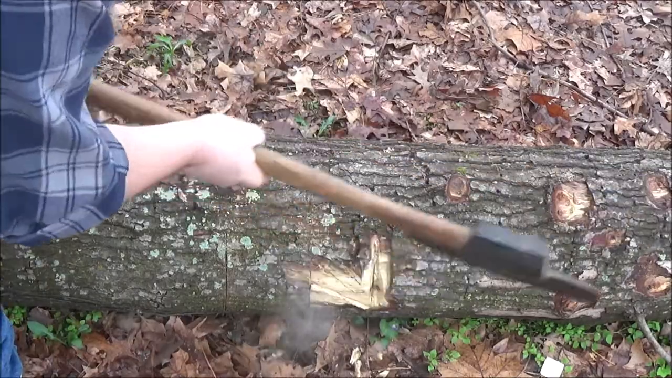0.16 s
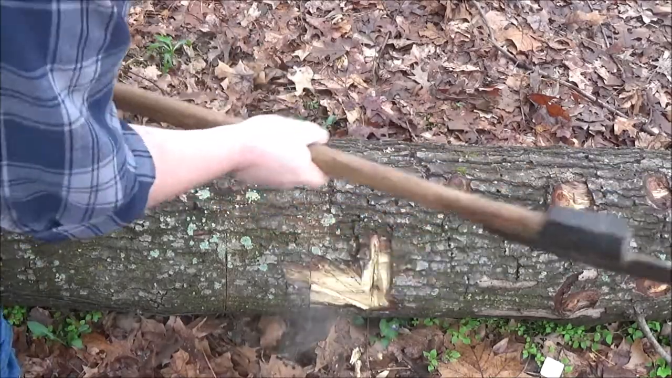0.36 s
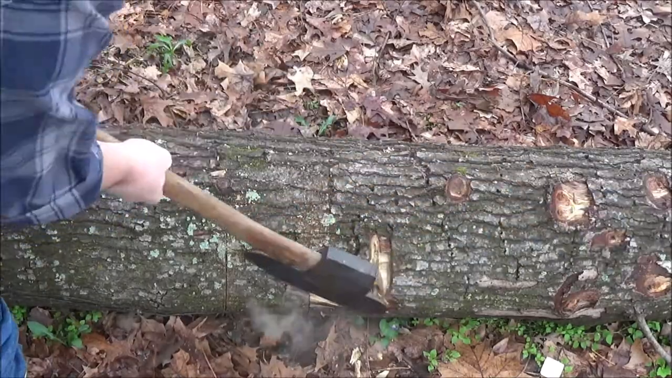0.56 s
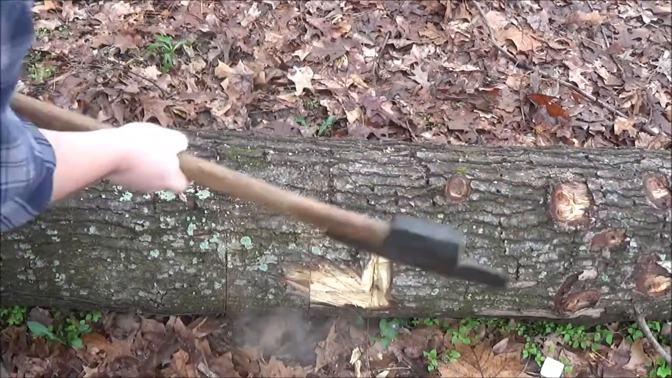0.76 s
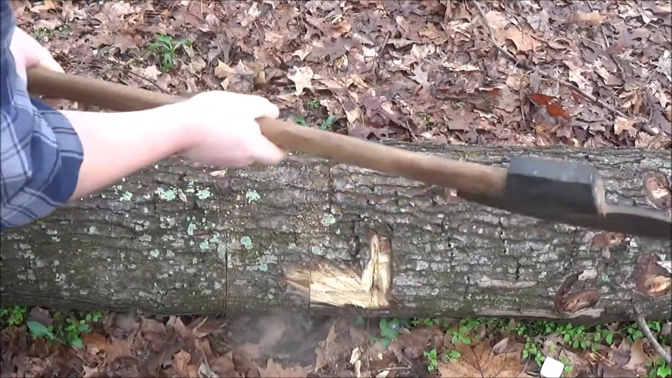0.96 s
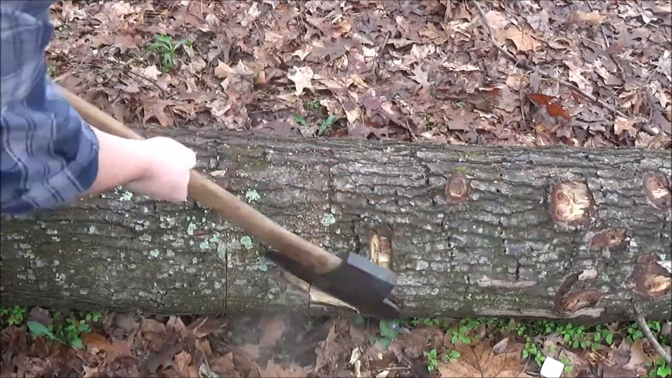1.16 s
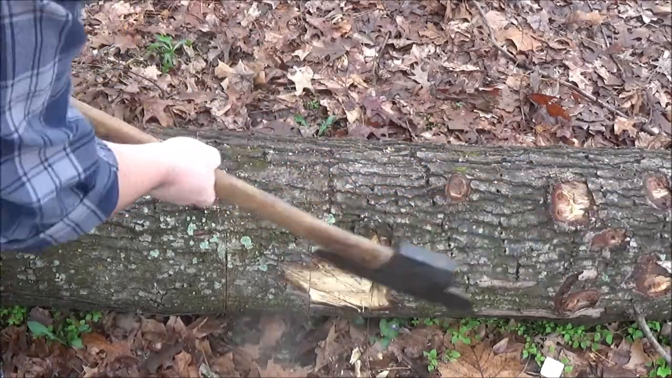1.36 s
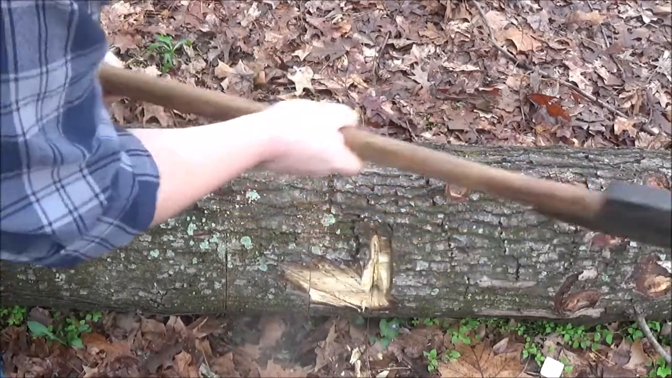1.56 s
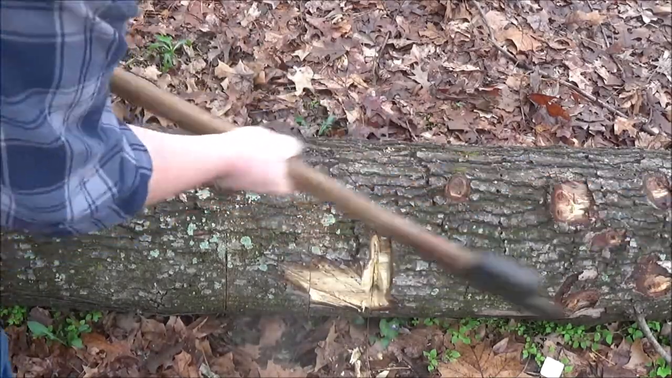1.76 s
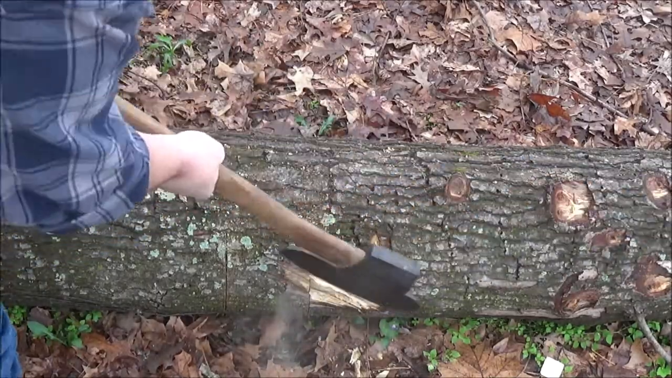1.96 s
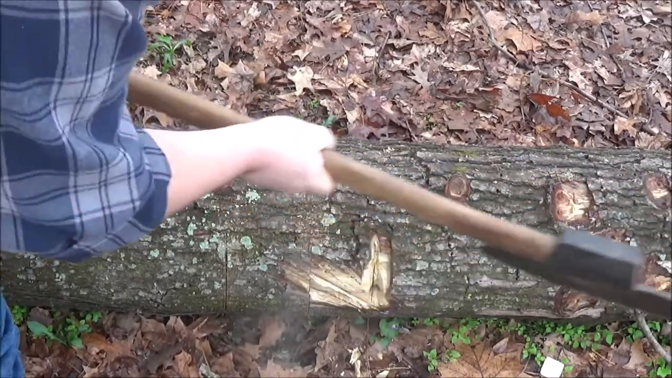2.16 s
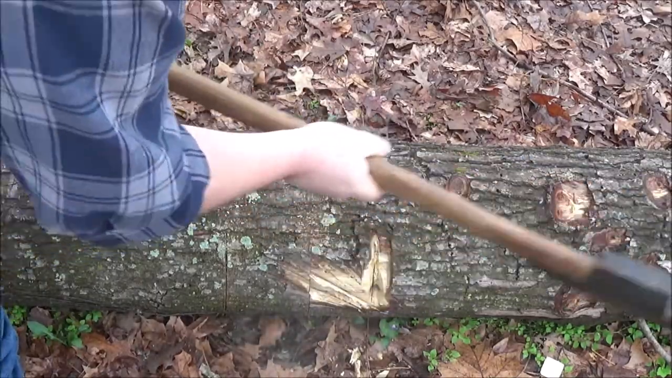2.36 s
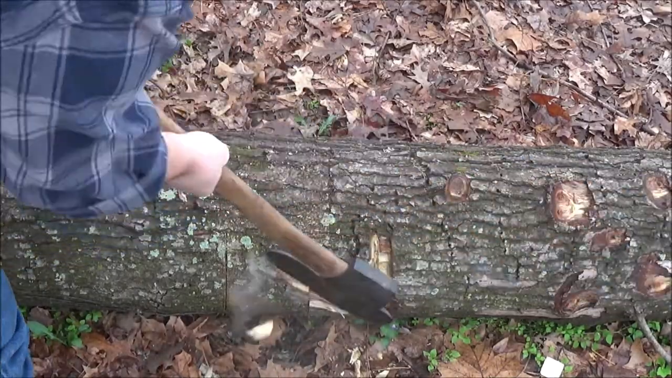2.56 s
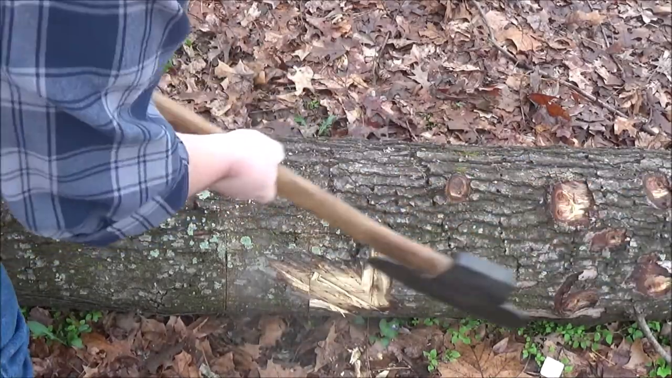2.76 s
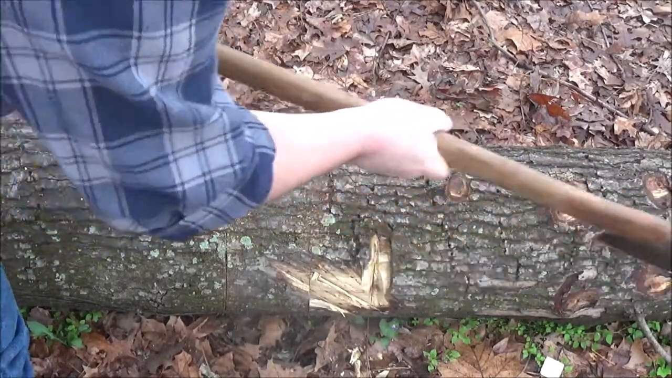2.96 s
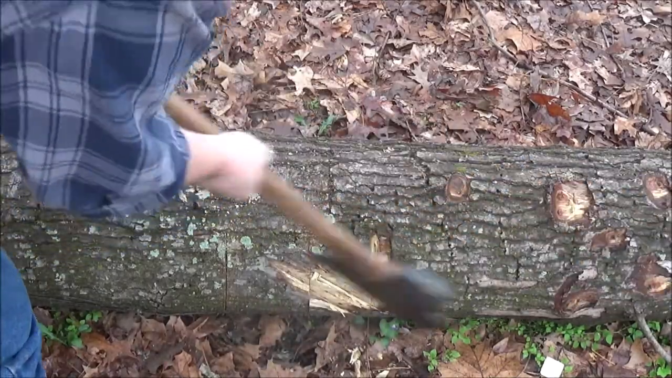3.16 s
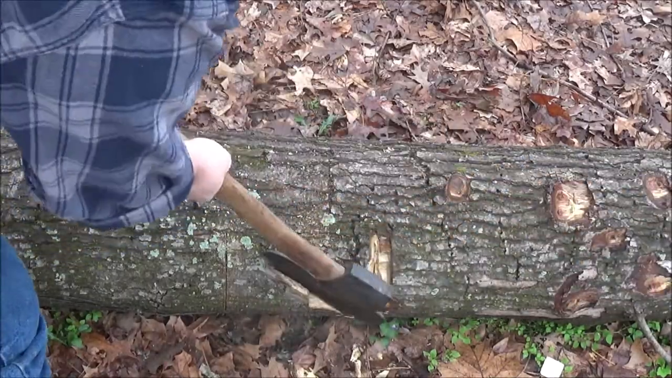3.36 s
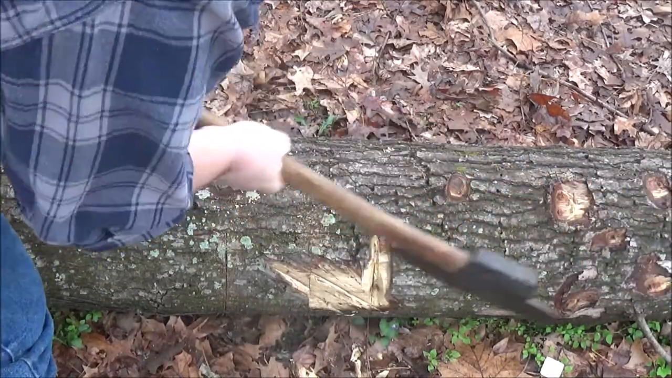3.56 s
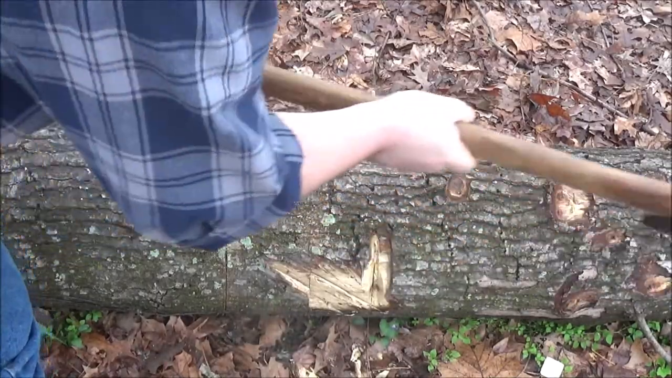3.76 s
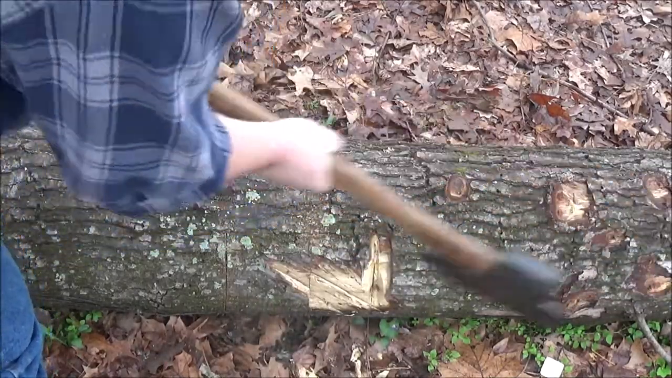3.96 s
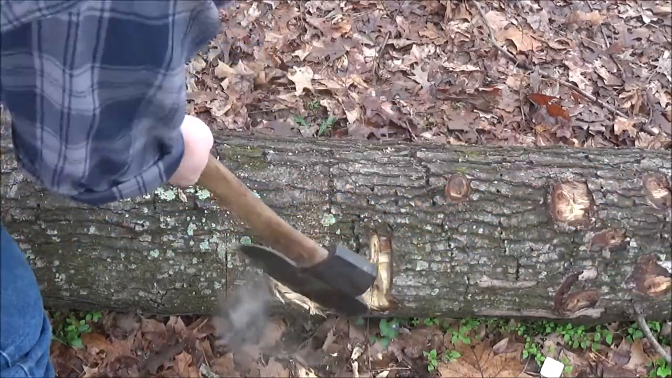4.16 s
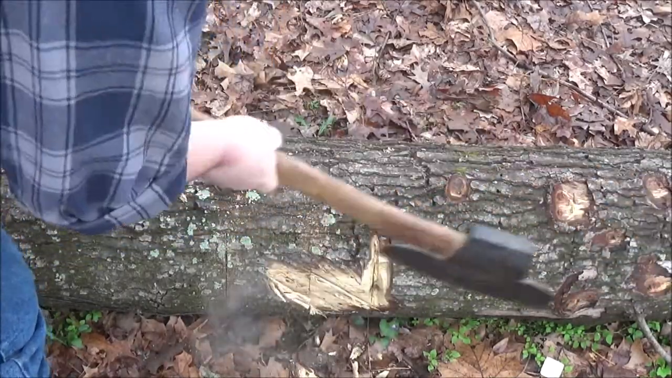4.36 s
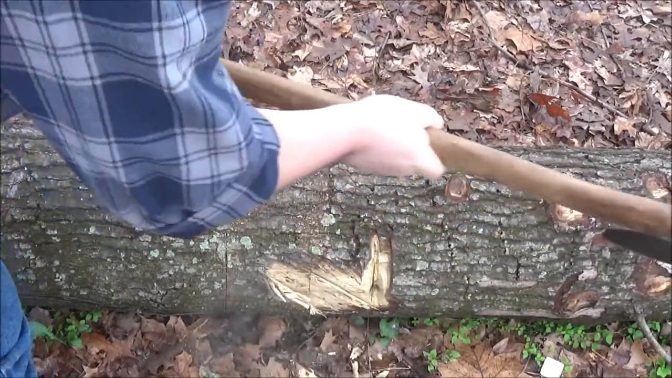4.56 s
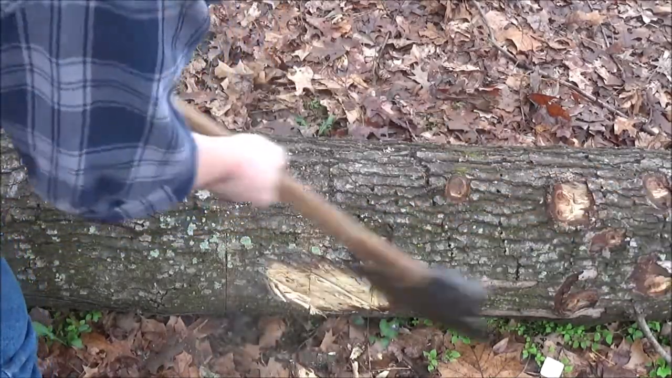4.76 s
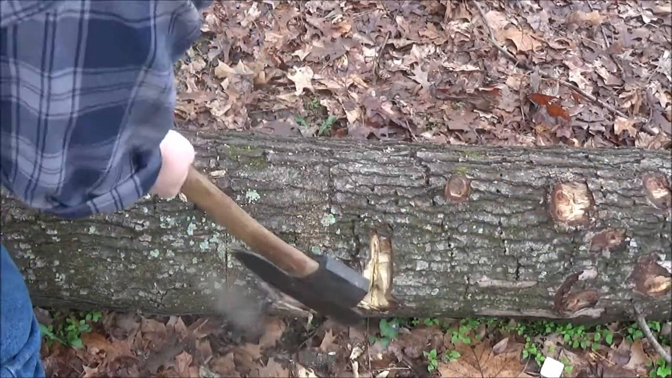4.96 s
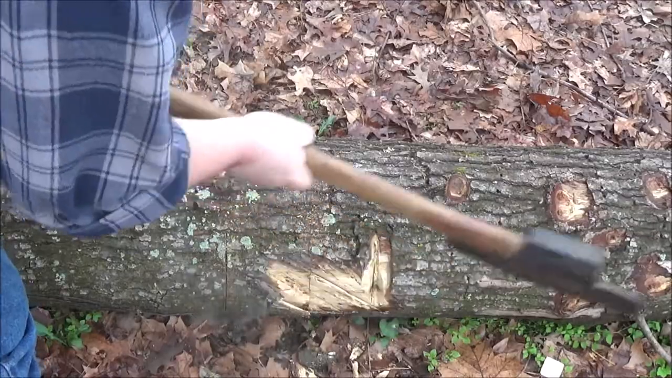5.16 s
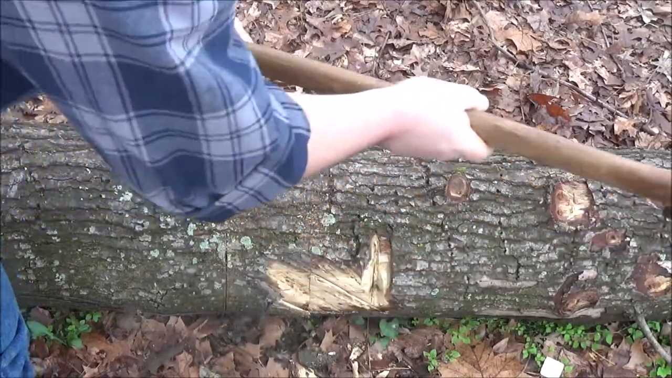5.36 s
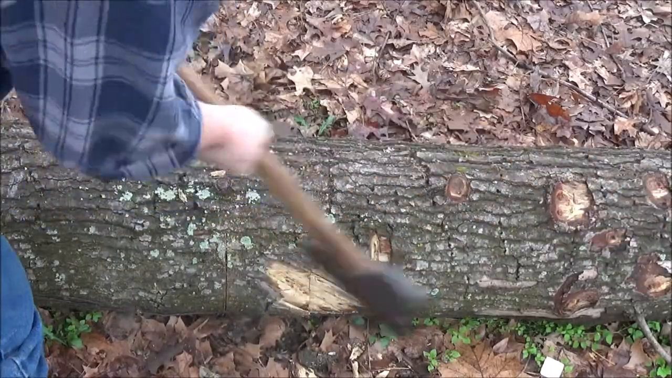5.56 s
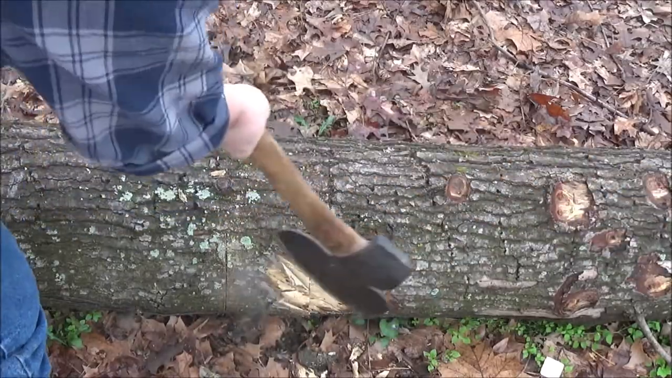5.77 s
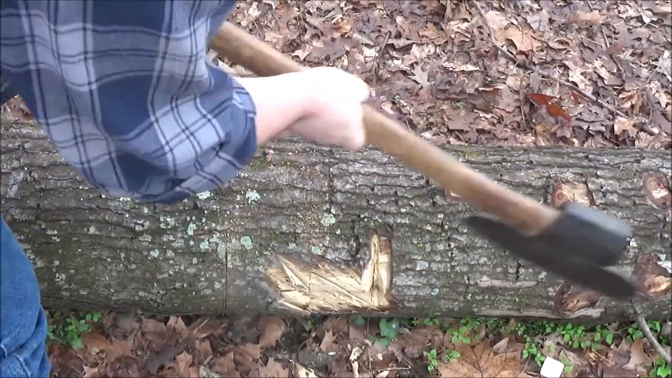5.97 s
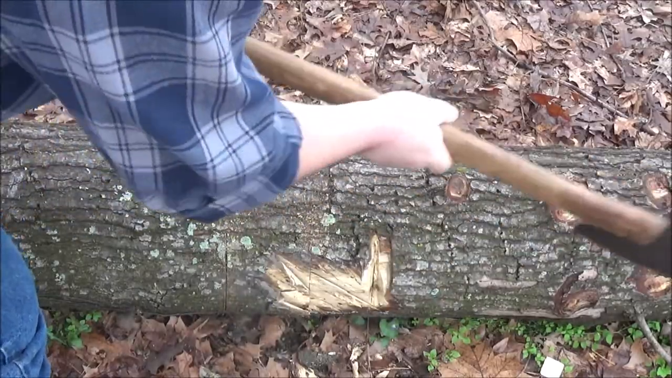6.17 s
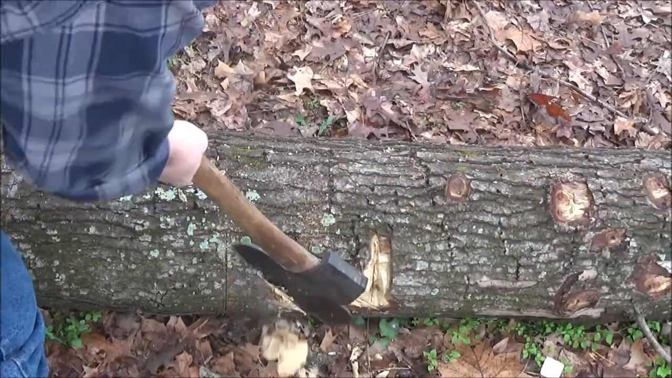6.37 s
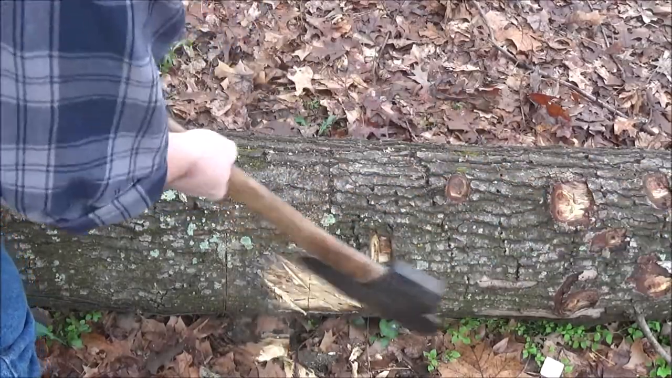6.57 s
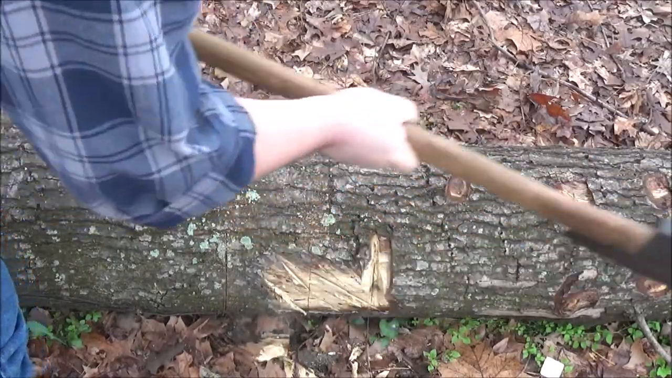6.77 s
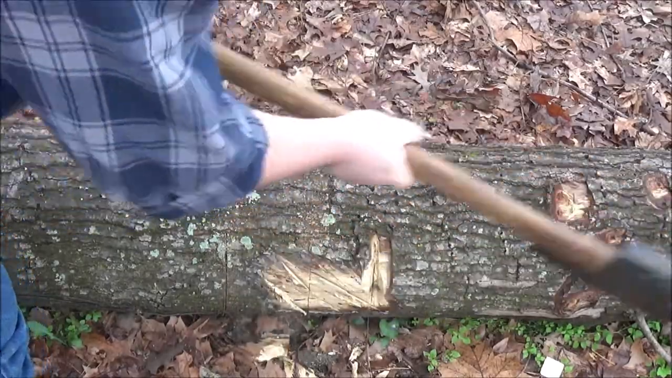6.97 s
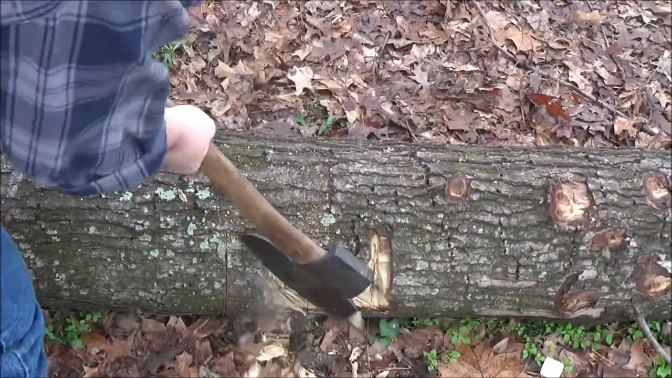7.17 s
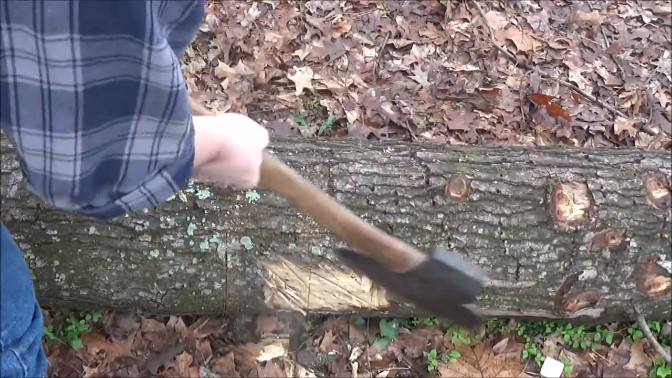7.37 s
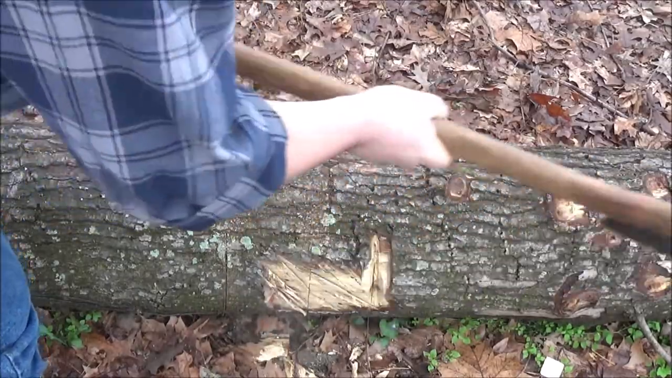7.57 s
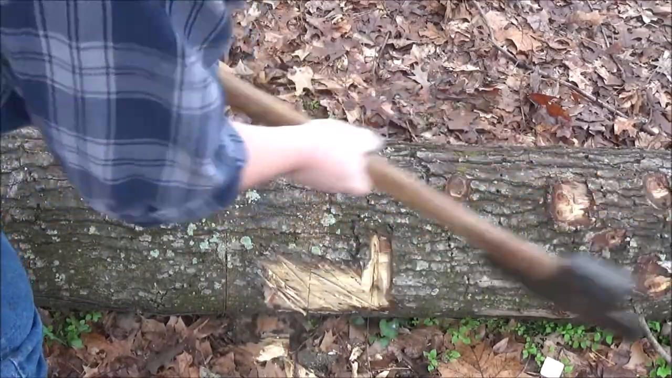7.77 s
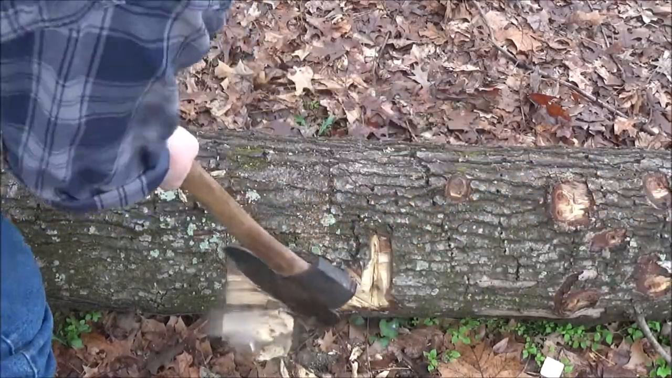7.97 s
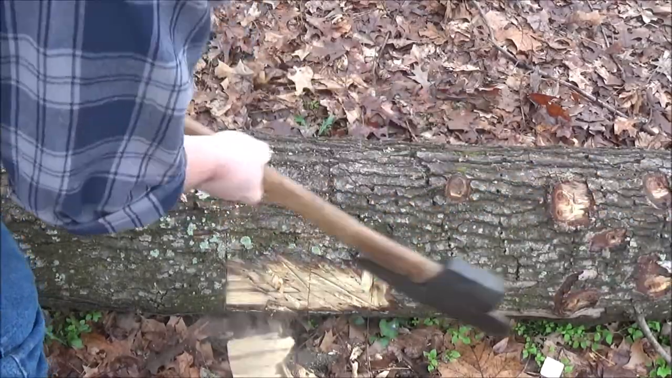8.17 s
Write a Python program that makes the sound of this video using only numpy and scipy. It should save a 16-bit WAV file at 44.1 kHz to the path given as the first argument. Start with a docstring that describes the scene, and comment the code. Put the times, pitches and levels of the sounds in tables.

```python
"""In a wood, with a far rush, a faint hum and a trill of quick pips, an axe hews a felled log close to the microphone.
About three blows fall in two seconds: noise snaps make the bite and split, damped modes the knock and boom.
After each, filtered crackle showers chips and bark into dry leaves, with a few brief soft swishes of the same rustle.
From about two seconds come faint thin whistling sines, level or gliding, and high rising chirps; late on the rush grows.
The trees answer all but the rush, hum and trill with a weak diffuse tail."""
import sys
import numpy as np
from scipy import signal
from scipy.fft import rfft, irfft
from scipy.io import wavfile
from scipy.ndimage import map_coordinates

SR = 44100
rng = np.random.default_rng(int(sys.argv[2]) if len(sys.argv) > 2 else 0)


def materialize(psi):
    """Save the field psi as 16-bit PCM at rate SR to the path in sys.argv[1].

    A 1-D psi becomes a single channel; in a 2-D psi each row is a channel.
    """
    bounded = np.clip(np.atleast_2d(psi).T, -1, 1)
    quanta = np.round(bounded * 32767).astype(np.int16)
    wavfile.write(sys.argv[1], SR, quanta)


N = 362502

# axe blows: (time [s], bite level [dB], wait until the split [s], split length [s], split level [dB],
#   brightness [dB/octave], knock level [dB], boom level [dB], boom centre [Hz],
#   debris level [dB], debris keeps falling for [s])
BLOWS = [(-0.055, -20, 0.003, 0.006, -1, 3, -27, -27.5, 258, -35.5, 0.16),
         (0.5359, -17.5, 0.0018, 0.0094, -12.5, 1.5, -27.5, -31.5, 368, -41.5, 0.57),
         (1.1785, -25.5, 0.0044, 0.0014, -9.5, 0.7, -25.5, -23, 416, -42, 0.24),
         (1.864, -24, 0.0019, 0.0033, -8.5, 2.5, -28, -21, 300, -39, 0.14),
         (2.5275, -13, 0.0034, 0.0057, -12.5, -0.5, -16.5, -26, 287, -45.5, 0.32),
         (3.2378, -19, 0.0029, 0.0022, -9.5, 0.5, -17.5, -23.5, 352, -41, 0.12),
         (4.072, -16, 0.0036, 0.0071, -13, 0.3, -22, -31, 302, -35, 0.24),
         (4.854, -23, 0.0019, 0.012, -13.5, 0.2, -21, -29.5, 305, -45, 0.24),
         (5.6306, -20, 0.0025, 0.0059, -12, 2, -26.5, -24, 334, -43.5, 0.44),
         (6.368, -10.5, 0.0038, 0.0068, -11.5, 1.5, -24, -25, 336, -40.5, 0.24),
         (7.1233, -13.5, 0.0027, 0.0049, -11, 0.5, -23, -26.5, 273, -40, 0.26),
         (7.9014, -20, 0.0013, 0.0095, -13, -0.5, -16.5, -24, 325, -39.5, 0.41)]
# spectrum of crushed dry leaves: (frequency [Hz], relative level [dB])
DRY_LEAF_SPECTRUM = [(80, -30), (400, -10), (1000, -3.5), (2000, -2), (4000, -0.5), (6500, 0.5),
                     (9300, 2.5), (11000, -6.5), (15500, -21.5)]


def amp(db):
    """Decibels to gain."""
    return 10 ** (np.asarray(db) / 20)


def unit(x):
    """Scaled to rms 1."""
    return x / np.sqrt(np.mean(x ** 2) + 1e-20)


def along(points, hz):
    """Values at hz, interpolated between (Hz, value) points on a log frequency axis."""
    f, v = np.transpose(points)
    return np.interp(np.log(hz + 1), np.log(f + 1), v)


def wobble(rate):
    """A smooth random curve, rate knots a second."""
    knots = rng.standard_normal(int(N * rate / SR) + 4)
    return map_coordinates(knots, [np.arange(N) * rate / SR])


def coloured(x, db_of_hz, size=2048):
    """x through a causal minimum-phase filter of unit energy with the given relative dB response."""
    cepstrum = irfft(np.log(amp(db_of_hz(np.fft.rfftfreq(size, 1 / SR))) + 1e-6))
    # folding the cepstrum forward makes the filter causal
    cepstrum[1:size // 2] *= 2
    cepstrum[size // 2 + 1:] = 0
    kernel = irfft(np.exp(rfft(cepstrum)))
    return signal.fftconvolve(x, kernel / np.linalg.norm(kernel))[:len(x)]


def tilt(hz, db_per_octave):
    """A spectral slope from 700 Hz to 10 kHz, flat beyond, in dB about 4 kHz."""
    return db_per_octave * np.log2(np.clip(hz, 700, 10000) / 4000)


def crackle(count, rate, spread_db):
    """Random snaps of either sign and uneven size, rate a second on average, rms 1."""
    hit = rng.random(count) < rate / SR
    sign = rng.choice([-1, 1], count)
    size = amp(spread_db * np.clip(rng.standard_normal(count), -2, 2))
    return unit(hit * sign * size)


def held(x, seconds):
    """x scaled to the energy of rms 1 held for that long."""
    return x * np.sqrt(seconds * SR / (np.sum(x ** 2) + 1e-20))


def add(track, s, sound):
    """Mix a sound into the track from time s, as far as it overlaps."""
    start = round(s * SR)
    sound = sound[..., max(-start, 0):]
    part = track[..., max(start, 0):max(start, 0) + sound.shape[-1]]
    part += sound[..., :part.shape[-1]]


def placed(x, pan_db):
    """Mono to stereo with a level difference."""
    return x * amp([[pan_db / 2], [-pan_db / 2]])


def burst(t, length, rise, fall):
    """An envelope that opens at t = 0, holds, then dies with time constant fall."""
    opening = 1 - np.exp(-np.maximum(t, 0) / rise)
    return opening * np.exp(-np.maximum(t - length, 0) / fall)


def ring(modes, t, drive, scatter_db, detune):
    """Damped modes under a drive (dB by Hz); each blow draws new strengths, pitches and phases."""
    hz, db, t60 = np.transpose(modes)[:, :, None]
    size, pitch, phase = rng.standard_normal((3, len(modes), 1))
    gain = amp(db + scatter_db * size + drive(hz) - 60 * t / t60)
    return np.sum(gain * np.sin(2 * np.pi * (hz * (1 + detune * pitch) * t + phase)), 0)


def far_rush():
    """Distant filtered noise, strongest below 1 kHz, almost steady and then slowly growing."""
    # spectrum of the far rush: (frequency [Hz], relative level [dB])
    air = [(15, -79), (25, -26.5), (134, -7.5), (285, -12), (451, -4.5), (545, -3.5), (591, -3.5), (775, 0),
           (1020, -2), (1940, -11.5), (3080, -15.5), (3720, -18.5), (6380, -20.5), (16000, -34)]
    rush_db, swell_from_s, swell_db_per_s = -46, 6.33, 2
    mid, side = (coloured(rng.standard_normal(N), lambda hz: along(air, hz), size=8192) for _ in range(2))
    swell_db = swell_db_per_s * np.maximum(np.arange(N) / SR - swell_from_s, 0)
    level = amp(rush_db + swell_db + 0.14 * wobble(6.7))
    return level * (mid + amp(-11) * np.array([side, -side]))


def drone(centre_hz=735, width_hz=22):
    """Narrow-band noise: a faint wavering hum within the distant rush."""
    band = lambda hz: -20 * np.log10(1 + ((hz - centre_hz) / width_hz) ** 2)
    hum = coloured(rng.standard_normal(N), band, size=8192)
    return amp(-68.5 + 4.1 * wobble(1)) * hum


def trill(centre_hz=2810, spread_hz=80):
    """An unbroken far trill: a quivering tone cut into short pips, about thirty a second."""
    beat = np.cumsum(30 * (1 + .03 * wobble(3))) / SR
    pips = np.sin(np.pi * beat) ** 4 * amp(1.2 * wobble(20))
    carrier = np.sin(2 * np.pi * np.cumsum(centre_hz + spread_hz * wobble(250)) / SR)
    return amp(-58.5) * unit(pips * carrier)


def crack(t, bite_db, wait, length, split_db, bright_db):
    """The edge bites, then fibres snap in a dense run as the wood splits."""
    # spectrum of tearing wood: (frequency [Hz], relative level [dB])
    tear = [(60, -20), (200, -23), (500, -2), (1200, 0), (2000, 0.5), (4000, 0.5), (6500, 0), (9300, -2),
            (11000, -11.5), (15500, -25.5)]
    bite = held(crackle(len(t), 14000, 4.4) * burst(t, 0.0024, 0.00031, 0.00078), 0.0035)
    tearing = burst(t - wait, length, 0.00071, 0.0025)
    tearing += amp(-16.0) * burst(t - wait, length, .002, 0.017)  # last fibres
    split = held(crackle(len(t), 10000, 5.1) * tearing, length + 0.00084)
    wood = lambda hz: along(tear, hz) + tilt(hz, bright_db)
    return coloured(amp(bite_db) * bite + amp(split_db) * split, wood)


def knock(t, wait, bright_db):
    """Axe and struck wood ring in short damped modes that build up within milliseconds."""
    # axe and struck wood: (frequency [Hz], relative level [dB], t60 [s])
    knock_modes = [(488, -15, 0.067), (632, -13, 0.073), (769.6, -5.5, 0.069), (906, -13, 0.11),
                   (1021.6, 1.5, 0.062), (1073.5, -3, 0.07), (1416, -2, 0.039), (1800, -8, 0.059),
                   (1976, -2.5, 0.045)]
    rung = ring(knock_modes, t, lambda hz: tilt(hz, bright_db), scatter_db=-0.5, detune=0.0041)
    return held(rung * (1 - np.exp(-(t / (wait + 0.0067)) ** 2)), 0.0092)


def trunk_body(t, centre_hz):
    """The trunk's low modes boom up slowly while the log thuds on the soil."""
    # the trunk: (frequency [Hz], relative level [dB], t60 [s])
    trunk_modes = [(168.4, -14.5, 0.18), (214, -7.5, 0.093), (235.6, 0.5, 0.14), (299.8, -10, 0.17),
                   (340.2, -3.5, 0.095), (367, 4, 0.079), (406.2, 2, 0.1), (438.5, -0.5, .13),
                   (521, -16, .08), (546, -7.5, 0.11), (620.7, -2, 0.11)]
    # each blow pushes the trunk hardest around its own frequency
    push = lambda hz: -10 * np.minimum(np.log2((hz + 1) / centre_hz) ** 2, 2)
    swell = 1 - np.exp(-(t / 0.023) ** 3)
    boom = held(ring(trunk_modes, t, push, scatter_db=0.9, detune=0.014) * swell, 0.043)
    # the log jolts on the soil: a dull thud without pitch
    soil_points = [(40, -22), (130, -4.0), (260, 0.5), (430, -9.5), (700, -3), (2000, -31)]
    soil = lambda hz: along(soil_points, hz) + push(hz)
    thud = held(coloured(rng.standard_normal(len(t)), soil) * swell * np.exp(-t / 0.015), 0.052)
    return amp(-0.8) * boom + amp(-7) * thud


def axe():
    """Each blow sums the crack of the fibres, the knock and the slower boom of the trunk."""
    out, t = np.zeros((2, N)), np.arange(int(.4 * SR)) / SR
    for s, bite_db, wait, length, split_db, bright_db, knock_db, boom_db, centre_hz, *_ in BLOWS:
        blow = placed(crack(t, bite_db, wait, length, split_db, bright_db), 1.0)
        blow += placed(amp(knock_db) * knock(t, wait, bright_db), 1.4)
        blow += placed(amp(boom_db) * trunk_body(t, centre_hz), -.1)
        add(out, s, blow)
    return out


def shower():
    """Gain of the rustle: debris rises after each blow, holds, then thins out; soft swishes swell and fade."""
    # brief soft swishes, two of them just before a blow: (time [s], length [s], level [dB])
    swishes = [(2.3, 0.15, -56), (4.62, 0.05, -49), (5.605, 0.032, -50), (7.885, 0.038, -47)]
    stir_db = -62  # the leaves are never quite still
    rise_s, fade_db_per_s = 0.0095, 64  # first crumbs almost at once; thinning once debris stops falling
    t = np.arange(N) / SR
    power = np.full(N, amp(stir_db) ** 2)
    for s, *_, debris_db, falling_s in BLOWS:
        rise = 1 - np.exp(-np.maximum(t - s, 0) / rise_s)
        fade_db = fade_db_per_s * np.maximum(t - s - falling_s, 0)
        power += (rise * amp(debris_db - fade_db)) ** 2
    for s, length, db in swishes:
        power += amp(db) ** 2 * np.exp(-((t - s) / length) ** 2)
    return np.sqrt(power)


def leaves(debris):
    """Crumbs patter on many leaves, each kind with its own pitch and place, over a grainy rustle."""
    patter = np.zeros((2, N))
    for centre_hz in np.geomspace(1400, 9000, num=7):
        octaves_off = lambda hz: abs(np.log2((hz + 1) / centre_hz))
        leaf = lambda hz: along(DRY_LEAF_SPECTRUM, hz) - 13 * np.minimum(octaves_off(hz), 2)
        pan_db = rng.normal(1, 2)
        patter += placed(coloured(crackle(N, 90, 7.8), leaf), pan_db) * (centre_hz / 4000) ** 0.48
    rustle = coloured(crackle(N, 3000, 6), lambda hz: along(DRY_LEAF_SPECTRUM, hz))
    clumps = amp(3.1 * wobble(90))
    return debris * (amp(-0.66) * unit(patter * clumps) + amp(-2.0) * unit(rustle * clumps))


def chips(landings):
    """A landing chip ticks, crushes leaves and leaves them trembling; the briefest are mostly tick."""
    # a chip that rings lower is also duller: slope in dB/octave per octave of ring from neutral
    neutral_hz, slope_per_octave = 5800, 1.43
    out, t = np.zeros((2, N)), np.arange(int(.2 * SR)) / SR
    for s, db, length, ring_hz in landings:
        hardness = np.clip(np.exp(-length / 0.0063), 0, 1)
        crush = burst(t, length * 0.68, length * 0.018, 0.0011 + length * 0.38)
        trembling = amp(-19) * burst(t, length, 0.0015, 0.037)
        snaps = held(crackle(len(t), 4500, 4.5) * (crush + trembling), length)
        tick = held(crackle(len(t), 30000, 2.0) * np.exp(-t / 0.00066), length * 0.87)
        contact = np.sqrt(hardness) * tick + np.sqrt(1 - hardness) * snaps
        bright_db = slope_per_octave * np.log2(ring_hz / neutral_hz)
        resonance = lambda hz: (4 + 5 * hardness) / (1 + (np.log2((hz + 1) / ring_hz) / 0.22) ** 2)
        colour = lambda hz: along(DRY_LEAF_SPECTRUM, hz) + tilt(hz, bright_db) + resonance(hz)
        add(out, s, placed(amp(db) * coloured(contact, colour), 1.1 + rng.normal(0, 0.65)))
    return out


def splinters():
    """Every blow sprays bits of bark: brief crackles on the leaves after uneven flights."""
    out, t = np.zeros((2, N)), np.arange(int(.03 * SR)) / SR
    for s, *_ in BLOWS:
        for flight, size, pitch, pan in rng.standard_normal(size=(16, 4)):
            delay = .018 + 0.055 * np.exp(0.72 * flight)
            centre_hz = 6500 * 2 ** (.5 * pitch)
            leaf = lambda hz: along(DRY_LEAF_SPECTRUM, hz) - 8 * abs(np.log2((hz + 1) / centre_hz))
            snaps = held(crackle(len(t), 6000, 3.7) * np.exp(-t / 0.0022), 0.0018)
            db = -33 + 3 * np.clip(size, -2, 1) - 25 * delay  # later bits are fainter
            add(out, s + delay, placed(amp(db) * coloured(snaps, leaf), 1 + pan))
    return out


def small_chips(count=10):
    """Landings for chips(), spread unevenly through each shower and the moments after it."""
    over_shower_db, length_s, middle_hz = 5, 0.0015, 6400
    straggle_s, fade_db_per_s = 0.29, 14  # landings outlast the shower, fainter the later they come
    rows = []
    for s, *_, debris_db, falling_s in BLOWS:
        for k, (when, size, pitch) in enumerate(rng.random((count, 3))):
            flight = 0.05 + (k + when) / count * (falling_s + straggle_s)
            db = debris_db + over_shower_db + 6 * (size - .5) - fade_db_per_s * flight
            rows.append((s + flight, db, length_s, middle_hz * 2 ** (2 * pitch - 1)))
    return rows


def ground(x):
    """Log and ground scatter the first milliseconds differently to each side."""
    t = np.arange(int(0.039 * SR)) / SR
    paths = rng.standard_normal(len(t)) * burst(t - .002, 0, 0.00096, 0.0074)
    colour = [(150, -15), (500, 6), (4000, 2.0), (8000, 3), (12000, -21.0)]
    scatter = coloured(paths, lambda hz: along(colour, hz))
    side = signal.fftconvolve(x.mean(0), scatter / np.linalg.norm(scatter))[:N]
    return x + amp(-19.5) * np.array([side, -side])


def trees(x):
    """The trunks around return a diffuse tail: noise that fades at its own rate in each band."""
    # decay among the trees: (frequency [Hz], t60 [s])
    woods = [(150, 0.48), (400, 0.34), (1000, 0.41), (3000, 0.36), (9000, 0.4), (16000, 0.19)]
    # colour of the tail: (frequency [Hz], relative level [dB])
    woods_colour = [(100, -9), (250, -5.5), (1000, 0.5), (2500, -2), (10000, -7.5)]
    hz, t, z = signal.stft(rng.standard_normal((2, SR)), SR, nperseg=256)
    fade_db = along(woods_colour, hz)[:, None] - 60 * t / along(woods, hz)[:, None]
    build_up = 1 - np.exp(-t / 0.032)
    tail = signal.istft(z * amp(fade_db) * build_up, SR, nperseg=256)[1]
    tail = tail / np.linalg.norm(tail[0])
    mid, side = signal.fftconvolve(x.mean(0)[None], tail, axes=1)[:, :N]
    return mid + amp(-10.5) * np.array([side, -side])


def thin_tones():
    """Quivering sines: faint thin whistling tones, level or gliding, with high rising chirps."""
    # high rising chirps, all alike: (time [s], level before a 6 dB lift [dB])
    chirp_rows = [(2.235, -50), (3.978, -52.5), (6.22, -48.5), (7.055, -51)]
    # faint thin whistling tones: (time [s], length [s], start [Hz], end [Hz], level before a 6 dB lift [dB])
    whistling = [(2.2, 0.1, 4640, 4580, -61), (2.33, 0.12, 5250, 5100, -60), (3.07, 0.089, 3130, 3120, -61),
                 (3.77, 0.28, 2730, 1850, -62), (4.45, 0.26, 2690, 1900, -59),
                 (4.9, 0.27, 3270, 3130, -56.5), (6.13, 0.052, 2690, 2670, -54.5),
                 (6.24, .13, 3870, 3900, -65), (6.66, 0.046, 2700, 2690, -52),
                 (6.9, 0.097, 2670, 2644, -53), (6.9, 0.13, 3680, 3860, -60), (6.92, 0.13, 2180, 2144, -62),
                 (6.95, 0.087, 4950, 5100, -59), (7.22, 0.13, 3220, 3200, -50),
                 (7.49, 0.11, 2680, 2640, -57), (7.78, .12, 3700, 3850, -59)]
    chirp_s, chirp_start_hz, chirp_end_hz = 0.048, 6430, 8400
    out = np.zeros(N)
    chirps = [(s, chirp_s, chirp_start_hz, chirp_end_hz, db) for s, db in chirp_rows]
    for tones, waver, bend in ((chirps, .03, 2.2), (whistling, .008, 1.05)):
        for s, length, start_hz, end_hz, db in tones:
            u = np.linspace(0, 1, int(length * SR))
            quiver = np.interp(u, np.linspace(0, 1, num=40), rng.standard_normal(size=40))
            glide_hz = start_hz + (end_hz - start_hz) * (1 - (1 - u) ** bend)
            hz = glide_hz * (1 + waver * quiver)
            envelope = np.abs(np.sin(np.pi * u)) ** 0.74
            add(out, s, amp(db + 6) * envelope * np.sin(2 * np.pi * np.cumsum(hz) / SR))
    return placed(out, 1.0)


def scene():
    """Axe and debris close to the microphone, the wood around them."""
    # big chips landing on leaves and twigs: (time [s], level [dB], length [s], ring [Hz])
    big_chips = [(0.004, -28, 0.021, 7500), (0.1216, -32, 0.0017, 9000), (0.169, -31, 0.052, 4500),
                 (0.632, -26.5, 0.015, 8400), (0.692, -28, 0.0061, 6140), (0.711, -33, 0.019, 7500),
                 (0.865, -30.5, 0.043, 5600), (0.8976, -22.5, 0.0024, 1480), (1.038, -33, 0.036, 6700),
                 (1.256, -19.5, 0.027, 5840), (1.406, -24.5, 0.0017, 7000), (1.4644, -27.5, 0.0036, 8000),
                 (1.5899, -30, 0.0023, 4030), (1.949, -14.5, 0.0029, 7500), (2.096, -30, 0.0028, 2180),
                 (2.2707, -30.5, 0.0021, 2800), (2.6206, -32, 0.018, 6110), (2.7155, -29, 0.015, 6500),
                 (2.7975, -21.5, 0.0022, 2450), (2.916, -34, 0.0078, 6000), (3.314, -29, 0.029, 3860),
                 (3.4265, -29.5, 0.018, 4590), (4.105, -29, 0.03, 6050), (4.1907, -20, 0.0019, 6560),
                 (4.2575, -20.5, 0.0026, 7850), (4.386, -21, 0.029, 6600), (4.884, -22, 0.0051, 5030),
                 (5.074, -38, 0.032, 4200), (5.2195, -35, 0.0085, 7000), (5.286, -35.5, 0.006, 2580),
                 (5.7897, -31.5, 0.034, 6000), (5.838, -25.5, 0.006, 3760), (5.8745, -29, 0.0055, 7950),
                 (5.93, -34, 0.031, 5500), (6.1206, -32, 0.0019, 6700), (6.451, -26.5, 0.043, 4530),
                 (6.6636, -22, 0.0021, 5370), (6.8774, -26, 0.0016, 5740), (7.2785, -26, 0.0078, 3480),
                 (7.353, -26, 0.01, 8610), (7.3821, -17, 0.0028, 2450), (7.43, -26, 0.012, 7550),
                 (7.459, -23.5, 0.0018, 1430), (8.0403, -13, 0.0019, 2320), (8.0854, -24.5, 0.0053, 6680),
                 (8.143, -24, 0.03, 6160), (8.185, -28, 0.038, 8440)]
    near = ground(axe() + splinters() + chips(big_chips) + leaves(shower()) + chips(small_chips()))
    tones = thin_tones()
    # the thin tones are blurred by the trees
    faint = tones + amp(-5) * trees(tones) + trill() + drone() + far_rush()
    return near + amp(-18) * trees(near) + faint


def record(dry):
    """The loudest peaks are rounded off; a steep low-pass shuts out the top of the treble."""
    top_hz = 16000
    rounded = dry / (1 + np.abs(dry) ** 6) ** (1 / 6)
    return signal.sosfilt(signal.ellip(10, .1, 90, top_hz, fs=SR, output="sos"), rounded)


dry = scene()
out = record(dry)
materialize(out)
```